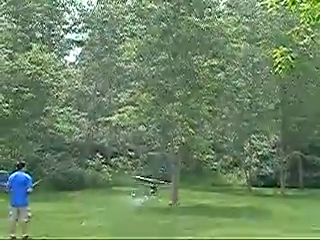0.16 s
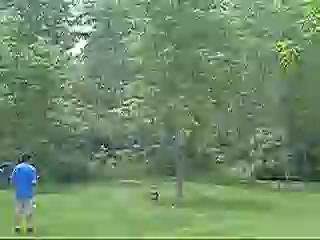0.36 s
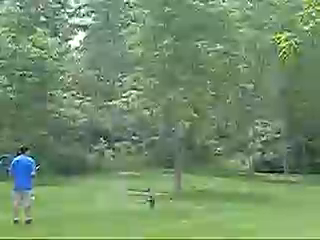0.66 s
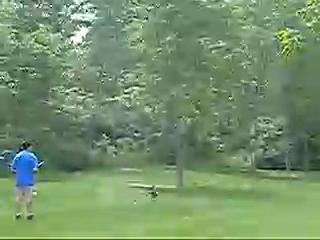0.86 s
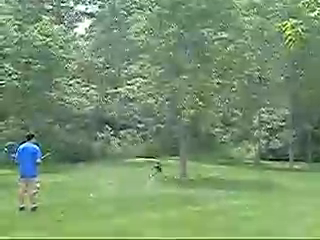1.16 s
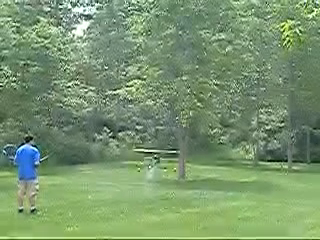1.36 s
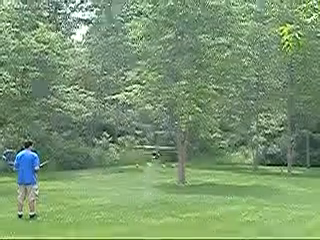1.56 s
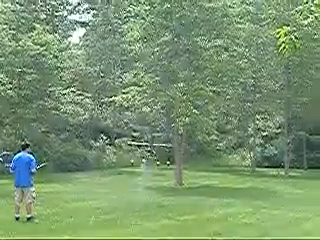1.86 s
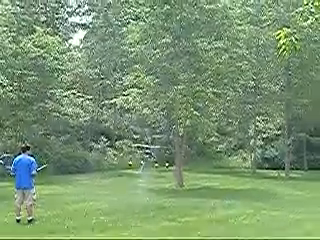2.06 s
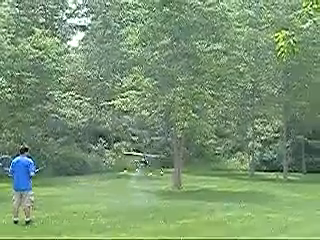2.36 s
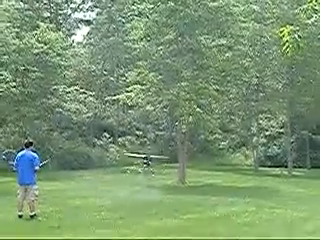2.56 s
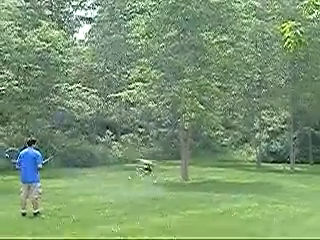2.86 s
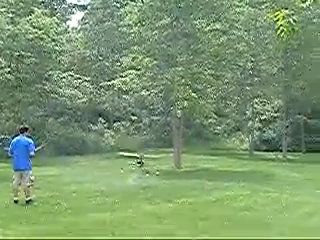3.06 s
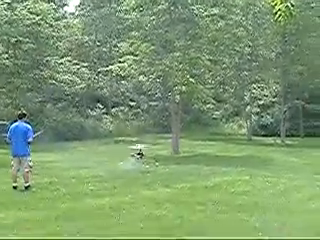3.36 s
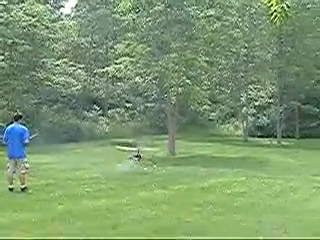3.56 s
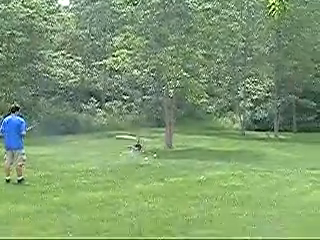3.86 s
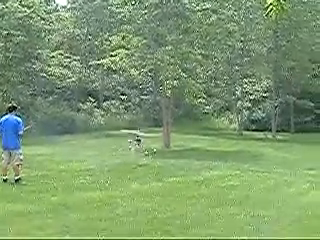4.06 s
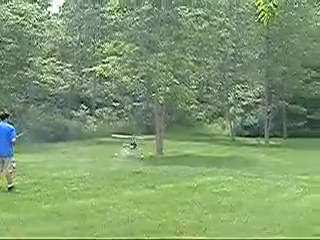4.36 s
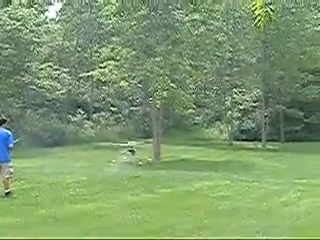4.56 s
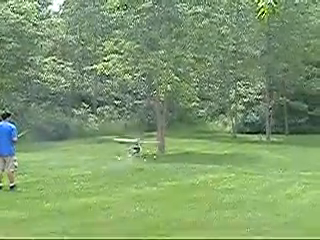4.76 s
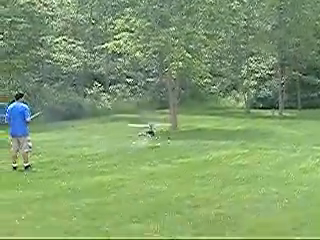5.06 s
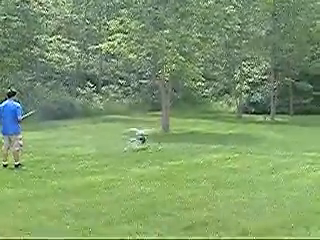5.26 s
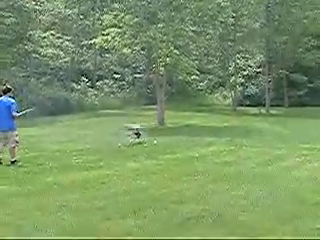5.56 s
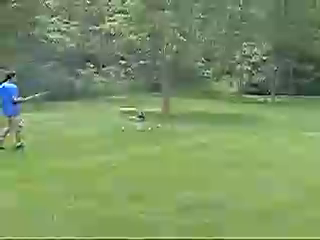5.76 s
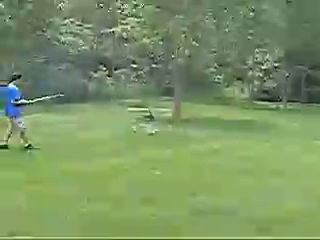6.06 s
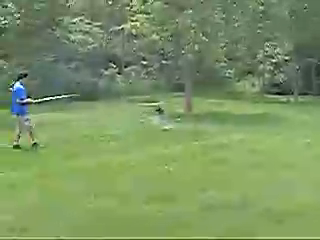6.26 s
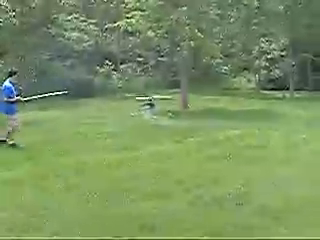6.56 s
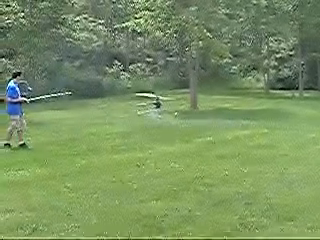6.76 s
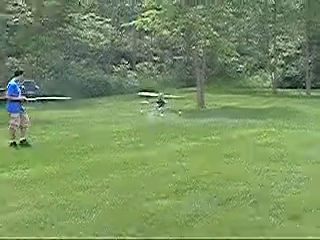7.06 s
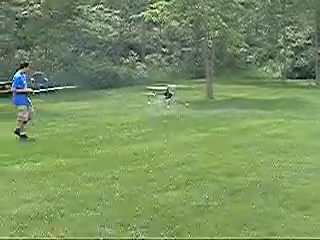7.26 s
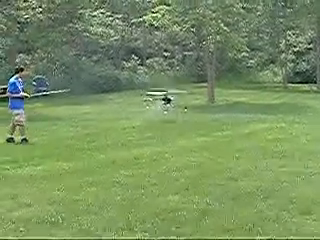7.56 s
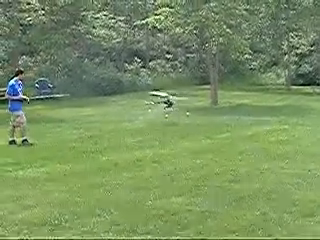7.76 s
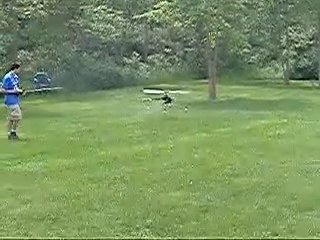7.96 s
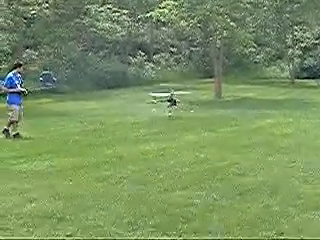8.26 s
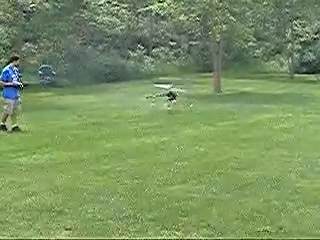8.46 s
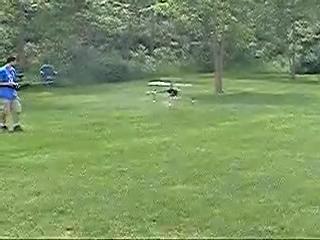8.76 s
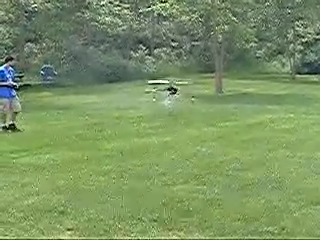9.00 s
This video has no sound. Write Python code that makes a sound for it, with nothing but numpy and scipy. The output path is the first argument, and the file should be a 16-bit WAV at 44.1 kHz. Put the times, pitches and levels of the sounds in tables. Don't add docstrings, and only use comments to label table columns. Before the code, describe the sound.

A small glow-engine helicopter hovers over a lawn a few metres from a cheap camera microphone, already running at the start and never stopping. Its rapid firing makes a low buzzing note around 210 hertz beneath a loud, nasal, raspy whine, strongest around two kilohertz. From 0 to 1.4 seconds the pitch slides down slightly, then climbs back by about 3. It dips again around 4.2 and recovers by 4.7, staying nearly steady to the end at about 9 seconds, with a tiny dip near 8.9. The timbre shifts between clean drone and rough flutter as the craft turns and bobs. Faint rotor tones, fan hiss and downwash lie underneath, with small microphone puffs near 3.2 and 5.4. A handling tick comes at 6.7, and a subtle rotor throb around 8. Peaks crackle with overload; the treble is dull and ragged.

```python
import sys
import numpy as np
from scipy import signal
from scipy.io import wavfile
from scipy.ndimage import uniform_filter1d

SR = 44100
rng = np.random.default_rng(int(sys.argv[2]) if len(sys.argv) > 2 else 0)


def amplitude_ratio(level_db):
    exponent = np.asarray(level_db, float) / 20
    return 10 ** exponent


def generate_wav(sig):
    pcm = np.round(np.clip(np.atleast_2d(sig).T, -1, 1) * 32767).astype(np.int16)
    wavfile.write(sys.argv[1], SR, pcm)


N = 402633

CRUISE_HZ, SPEED_STEP_HZ = 210, 5
# t/s, f/Hz
CRANK_SPEED = [(0, 214.9), (.3, 210.6), (.6, 207.6), (1.05, 203.1), (1.35, 199.9), (1.95, 209.5),
               (2.7, 212.8), (3.05, 214.2), (3.4, 208.1), (4.15, 203.7), (4.65, 212.3), (5.2, 212.6),
               (5.6, 214.5), (6.15, 214.5), (6.75, 213.7), (8.55, 214.4), (8.85, 210.2), (9.13, 212.2)]
# t/s, outlet facing listener/step, height/step, mixture richness/step, bank/step
FLIGHT_STATE = [(0.0, 1, 2.2, 0.9, -1.8), (0.75, 0.5, -0.43, -1.6, 1), (0.9, -0.4, -1.5, 3, -4.5),
                (1.35, 1.8, -1.37, -0.6, 1.5), (1.5, 0.03, 1.6, -1.3, 0.2), (2.55, 0.65, 1.93, -0.23, 1.66),
                (3.0, 1.74, 0.8, -1.65, -3.5), (3.3, 0.35, 0.11, -1.8, 1.1), (3.9, 0.6, -1.6, 0.6, 1.8),
                (4.35, -1, -0.22, -2.4, 0.4), (4.5, 1.35, 0.14, -1.7, 0.3), (5.4, 1, -0.84, 0.43, 1.7),
                (5.7, 2, -1.11, 2.4, -0.6), (6.45, 0.07, -1.12, -1.0, 1.04), (7.05, 1.2, -0.3, -1.9, -1.1),
                (7.65, -1.5, 0.34, -1.6, -1.1), (8.55, -0.2, -0.37, 0.6, 0.6),
                (9.13, 0.5, -0.59, -1.6, -2.18)]
# level/dB, then slope/(dB per step) of facing, height, richness, bank, speed
NOISE_LEVEL_LAW = [
    (-24.0, -0.2, -0.65, 2.0, -0.049, -1.5),
    (-28, 0.3, 4, 0.1, -0.7, -0.73),
    (-29.5, 0.7, -3, -1.2, -0.28, -1.0),
    (-14.5, 0.4, -1.1, -1.0, -1.5, 0.65),
    (-18.5, -0.2, -0.5, -1.5, 1.6, -0.1),
    (-24, 0.4, 0.5, 0.8, -0.23, -0.79),
]


def evened(x):
    return x / np.sqrt(np.mean(x ** 2) + 1e-20)


def columns(rows):
    s, *values = np.transpose(rows)
    return [np.interp(np.arange(N) / SR, s, v) for v in values]


def speed_steps():
    return (columns(CRANK_SPEED)[0] - CRUISE_HZ) / SPEED_STEP_HZ


def levels(law):
    law = np.array(law)
    state = columns(FLIGHT_STATE) + [speed_steps()]
    return law[:, :1] + law[:, 1:] @ state


def causal(points, size=4096):
    f, db = np.transpose(points)
    hz = abs(np.fft.fftfreq(size, 1 / SR))
    log_gain = np.log(amplitude_ratio(np.interp(np.log(hz + 1), np.log(f + 1), db)))
    phase = signal.hilbert(log_gain).imag
    return np.fft.ifft(np.exp(log_gain - 1j * phase)).real[:size // 2]


def coloured(x, points):
    return signal.oaconvolve(x, causal(points))[:N]


def highpassed(x, order, hz):
    return signal.sosfilt(signal.butter(order, hz, "high", fs=SR, output="sos"), x)


def wander(hz):
    r = np.exp(-2 * np.pi * hz / SR)
    z = signal.lfilter([1], [1, -2 * r, r * r], rng.standard_normal((2, N)))
    return evened(z[0]) / np.sqrt(2) + 1j * evened(z[1]) / np.sqrt(2)


def tone(turns, db, fuzz, fuzz_hz):
    unsteady = 1 + fuzz * wander(fuzz_hz)
    return np.sqrt(2) * amplitude_ratio(db) * (unsteady * np.exp(2j * np.pi * turns)).real


def air():
    # f/Hz, level/dB
    wash_colour = [(15, -12), (60, -14.5), (100, -3), (200, 8.5), (1000, -8.5), (4000, -21.5)]
    # t/s, peak level/dB
    puffs = [
        (0.039, -50.5),
        (3.231, -34),
        (4.619, -55),
        (5.199, -42),
        (5.389, -38),
        (6.149, -40),
        (7.029, -44),
        (8.329, -47),
    ]
    # t/s, peak level/dB, f/Hz
    handling = [
        (6.749, -5, 776),
    ]
    gusty = amplitude_ratio(4 * wander(3).real)
    out = amplitude_ratio(-37) * evened(gusty * coloured(rng.standard_normal(N), wash_colour))
    t = np.arange(N) / SR
    for s, db in puffs:
        out += amplitude_ratio(db) * np.exp(-((t - s - .015) / 0.0055) ** 2)
    for s, db, hz in handling:
        u = np.maximum(t - s, 0)
        attack = (t >= s) * np.minimum(u * 8000, 1)
        out += amplitude_ratio(db + 2.5) * np.cos(2 * np.pi * hz * u) * np.exp(-u / 0.0013) * attack
    return out


def rotors(turns):
    # multiple of crank speed/1, rms level/dB,
    # width/Hz
    geared = [(.58, -54.5, 4.5), (0.781, -56, 6), (1.171, -38.5, 9.4), (1.879, -42, 3.1),
              (2.878, -58.5, 10)]
    return sum(tone(k * turns, db, 0.44, width_hz) for k, db, width_hz in geared)


def fan(turns, surplus):
    # f/Hz, level/dB
    duct_colour = [(1500, -46), (2500, -9.5), (2950, -0.5), (3420, -4.5), (3560, -0.5), (3750, -9),
                   (4150, -14), (4320, -7.5), (4500, -15.5), (5200, -20)]
    shaken = .8 + np.exp(-((turns - .4) % 1) / .3) * amplitude_ratio(4 * surplus)
    hiss = coloured(shaken * rng.standard_normal(N), duct_colour)
    return amplitude_ratio(levels(NOISE_LEVEL_LAW[-1:])[0]) * evened(hiss)


def firing(turns):
    lost_step, lost_per_height = .17, -.035
    weak_share, weak_per_height, weak_per_rich = 0.55, 0.065, 0.034
    count = int(turns[-1]) + 1
    turn = turns.astype(int)
    _, height, rich, _ = columns(FLIGHT_STATE)
    at = np.searchsorted(turns, np.arange(count))
    lost = rng.random(count) < lost_step + lost_per_height * height[at]
    sign = (-1.) ** (np.arange(count) + np.cumsum(lost))
    weak = np.clip(weak_share + weak_per_height * height + weak_per_rich * rich, 0, 1)
    scatter = .25 * rng.standard_normal(count)
    return weak * sign[turn] + scatter[turn]


def dispersed(x, hz, width_hz):
    r = np.exp(-np.pi * width_hz / SR)
    poles = np.array([1, -2 * r * np.cos(2 * np.pi * hz / SR), r * r])
    return signal.lfilter(poles[::-1], poles, x)


def rasp(turns, surplus):
    edges_hz = [820, 1380, 1760, 2100]
    trims_db = [-4.5, -0.5, -1.5, -10, -6]
    # f/Hz, level/dB
    pop_colour = [(90, -45), (150, -29.5), (300, -15), (720, -13), (830, -24), (1300, -33), (1500, -16),
                  (1720, -23.5), (1930, 0.5), (2130, -13.5), (2350, -4), (2750, -11.5), (3300, -35),
                  (4400, -46.5)]
    pops = surplus * np.diff(np.floor(turns), prepend=0)
    pops = dispersed(dispersed(pops, 290, 340), 612, 180)
    gust = np.exp(-(turns % 1) / .3) * amplitude_ratio(8 * surplus)
    steady = 1 - 0.026 * speed_steps()
    hiss = evened((steady + gust) * rng.standard_normal(N))
    jet = .55 * hiss + .55 * highpassed(hiss, 2, 1700)
    raw = coloured(evened(pops) + jet, pop_colour)
    below = [signal.sosfiltfilt(signal.butter(4, hz, fs=SR, output="sos"), raw) for hz in edges_hz]
    bands = np.diff([np.zeros(N), *below, raw], axis=0)
    bands /= np.sqrt(uniform_filter1d(bands ** 2, size=SR // 3, axis=1))
    levels_db = levels(NOISE_LEVEL_LAW[:-1])
    return sum(amplitude_ratio(db + trim_db) * b for b, db, trim_db in zip(bands, levels_db, trims_db))


def orders(turns, surplus):
    # level/dB, then slope/(dB per step) of facing, height, richness, bank, speed
    order_law = [
        (-26.0, 1.24, -0.36, 0.96, 0.4, -0.1),
        (-29.5, 4.5, 2.17, 1.2, 0.91, 1.74),
        (-29.0, 3.1, 1.7, 2.0, -1.1, -0.9),
        (-35.0, -0.25, 3.5, -0.1, 0.4, 0.5),
        (-29.5, 1.1, 1.9, -1.6, 0.2, -0.5),
        (-21.5, 0.5, -1.6, -1.8, -0.16, 0.9),
        (-25.5, 0.7, 0.24, -0.6, 1.1, -1.07),
        (-28.5, -0.2, 0.8, 1.8, 1.5, 5.5),
    ]
    # order/1, level re order 5/dB
    weak_low = [(2.5, -4.5), (3.5, 1.5), (4, -9), (6, -5.5)]
    # order/1, level re order 11/dB
    weak_high = [(8, -10.5), (10, -6), (13, -13.5)]
    fade_db = 2.5
    gear = .1175
    throb_depth, throb_at_s, throb_span_s = 0.17, 8, 0.29
    db1, db2, db3, db5, db7, db9, db11, db12 = levels(order_law)

    low = tone(turns, db1, 0.035, 30)
    low += tone(2 * turns + 0.47, db2, 0.22, 32)
    low += tone(3 * turns + 0.54, db3, 0.038, 30)
    for k, db in [(5, 0)] + weak_low:
        fade = fade_db * (1 + (k != 5)) / 2 * wander(1.5).real
        low += tone(k * turns, db5 + db - 1.5 + fade, .55, 18)

    late = turns - .15 + .019 * wander(16).real
    high = tone(7 * late + 0.33, db7 - 1.3, 0.54, 30)
    high += tone(9 * late, db9 - 0.6, 0.91, 40)
    high += tone(11 * late + 0.12, db11 + 1.74, .85, 36)
    high += tone(12 * late, db12 - 3, 1.0, 66)
    for k, db in weak_high:
        high += tone(k * late, db11 + db + fade_db * wander(1.2).real, 0.69, 30)
    high *= 1 + .9 * uniform_filter1d(surplus, size=60)

    throb = throb_depth * np.exp(-((np.arange(N) / SR - throb_at_s) / throb_span_s) ** 2)
    return low + high * (1 + throb * np.cos(2 * np.pi * gear * turns))


def scene():
    turns = np.cumsum(columns(CRANK_SPEED)[0]) / SR
    surplus = firing(turns)
    engine = orders(turns, surplus) + rasp(turns, surplus)
    return np.tile(engine + fan(turns, surplus) + rotors(turns) + air(), (2, 1))


def thrifty(x, floor_db=-71.5, spread_db=10.0):
    hz, _, z = signal.stft(x, SR, nperseg=2048)
    level_db = 10 * np.log10(uniform_filter1d(abs(z) ** 2, size=5, axis=0) + 1e-14)
    luck = evened(uniform_filter1d(rng.standard_normal(z.shape[1]), size=3))
    need_db = floor_db + spread_db * np.tanh(luck)
    weak = (level_db < need_db) & (hz[:, None] > 3400)
    return signal.istft(z * ~weak, SR, nperseg=2048)[1][:N]


def slipped(x):
    # t/s, level/dB
    slips = [(0.1269, -31), (0.1355, -24.5), (0.2867, -24.5), (1.1533, -29), (1.3184, -21.5),
             (1.5569, -32.5), (1.8138, -30), (1.915, -27), (1.9245, -22.5), (1.944, -29.5), (1.9914, -23.5),
             (2.0867, -27.5), (2.2528, -27), (2.4563, -27), (2.6025, -29), (2.6168, -26.5), (2.6544, -24),
             (2.9861, -27.5), (3.0073, -30), (4.8733, -29), (5.1881, -26.5), (5.3617, -26), (5.8316, -28.5),
             (6.0309, -26), (6.1704, -26.5), (6.4602, -30), (6.7491, -31), (6.882, -32.5), (8.555, -25.5),
             (9.1244, -13)]
    swing_s, swing_hz = .0004, 2100
    out, t = x.copy(), np.arange(-150, 151)
    pairs = rng.integers(1, 9, len(slips)) * rng.choice([-1, 1], len(slips))
    echoes = [(s + 2 * n / CRUISE_HZ, db - 10) for (s, db), n in zip(slips, pairs)]
    for s, db in slips + echoes:
        near = np.clip(round(s * SR) + t // 2 + 40, 0, N - 1)
        top = near[np.argmax(x[near])]
        at = np.clip(top + t, 0, N - 1)
        need = max(1 + amplitude_ratio(min(db, -22) + 6) - out[top], 0)
        lag_s = (at - top) / SR
        out[at] += need * np.exp(-(lag_s / swing_s) ** 2) * np.cos(2 * np.pi * swing_hz * lag_s)
    return out


def channel_grain():
    hz, _, z = signal.stft(rng.standard_normal(N), SR, nperseg=2048)
    apart = evened(uniform_filter1d(rng.standard_normal(z.shape[1]), size=3)) > .5
    band = (hz > 1950) & (hz < 2900)
    grain = signal.istft(z * apart * band[:, None], SR, nperseg=2048)[1][:N]
    return amplitude_ratio(-43) * evened(grain)


def top_cut(x):
    return signal.sosfilt(signal.butter(12, 15800, fs=SR, output="sos"), x)


def record(dry):
    ceiling, offset = .84, -.0148
    limited = np.clip(dry[0], -ceiling, ceiling)
    narrow = signal.oaconvolve(limited, signal.firwin(91, 4600, window=("kaiser", 8), fs=SR), "same")
    pair = slipped(thrifty(narrow) + offset) + np.outer([1, -1], channel_grain())
    clipped = np.clip(pair, -1, 1)
    splatter = highpassed(clipped - pair, 4, 5200)
    smear = rng.standard_normal((1, 3072)) * np.hanning(3072) / np.sqrt(600)
    mix = clipped + amplitude_ratio(-10.5) * signal.oaconvolve(splatter, smear, "same", axes=1)
    return top_cut(mix)


dry = scene()
out = record(dry)
generate_wav(out)
```